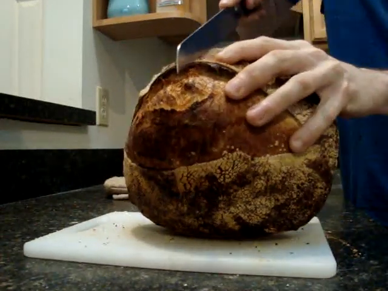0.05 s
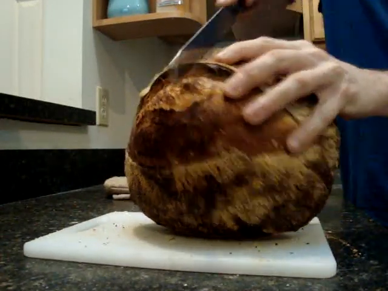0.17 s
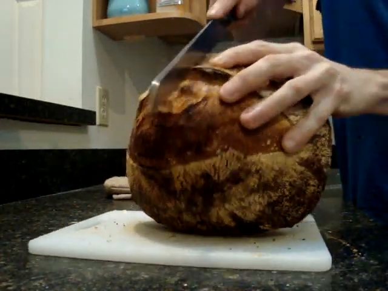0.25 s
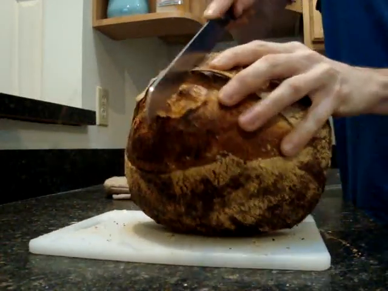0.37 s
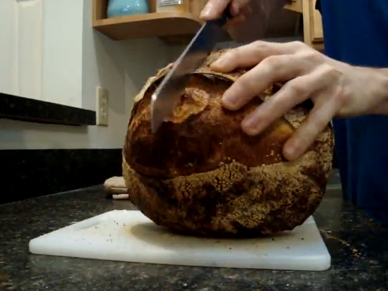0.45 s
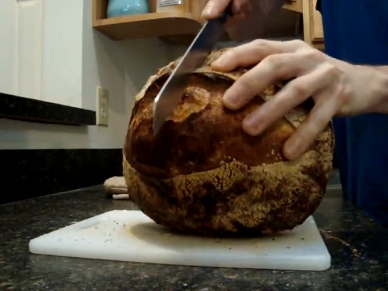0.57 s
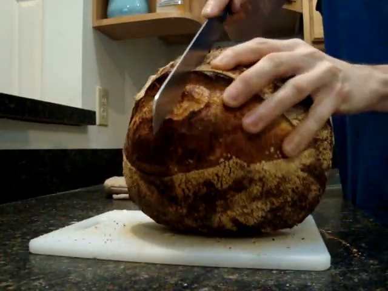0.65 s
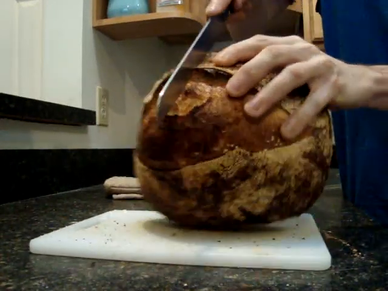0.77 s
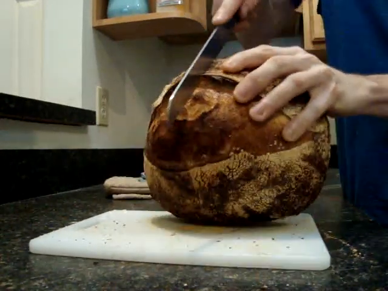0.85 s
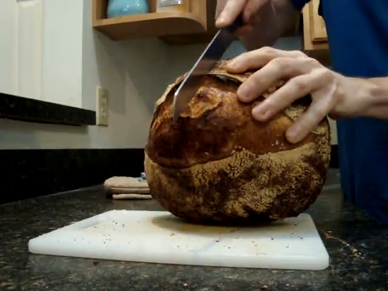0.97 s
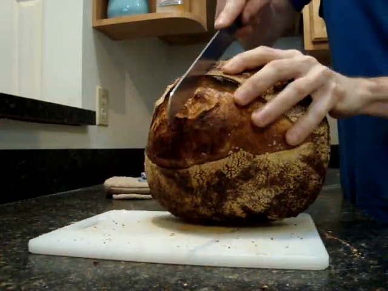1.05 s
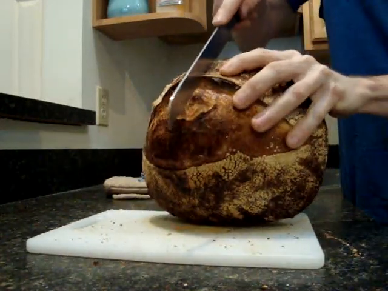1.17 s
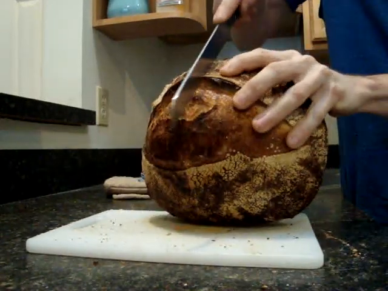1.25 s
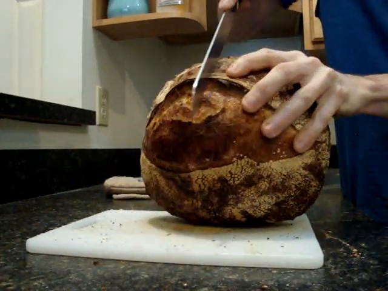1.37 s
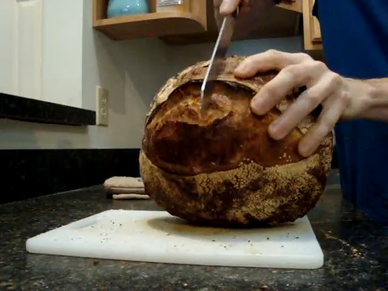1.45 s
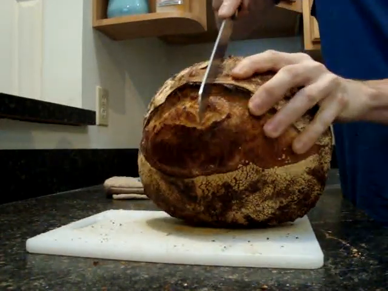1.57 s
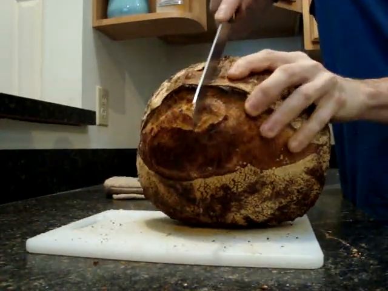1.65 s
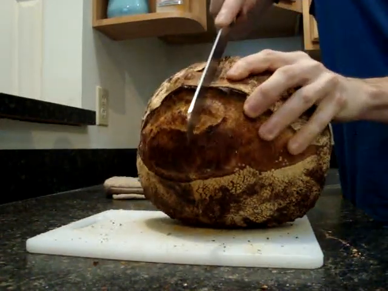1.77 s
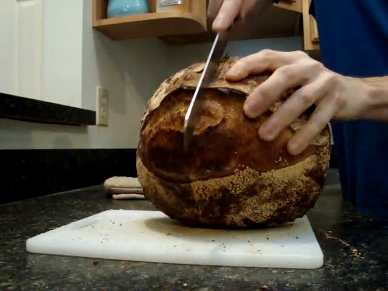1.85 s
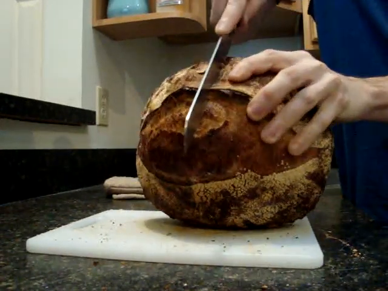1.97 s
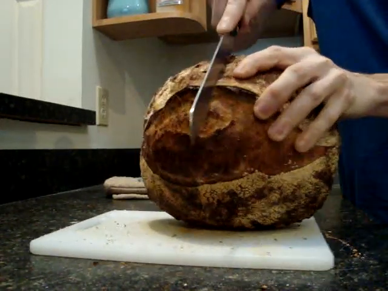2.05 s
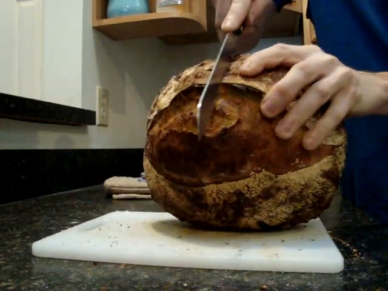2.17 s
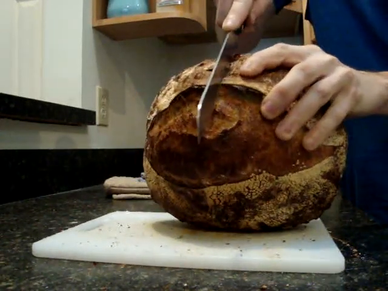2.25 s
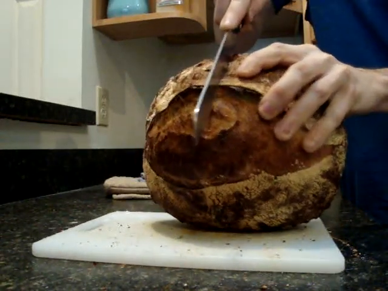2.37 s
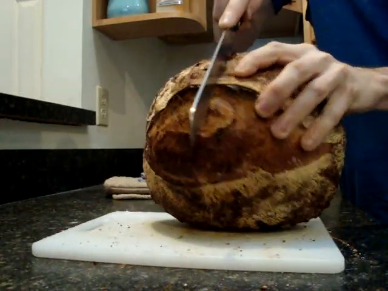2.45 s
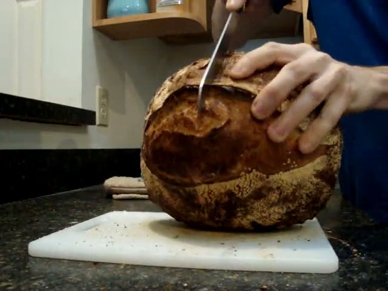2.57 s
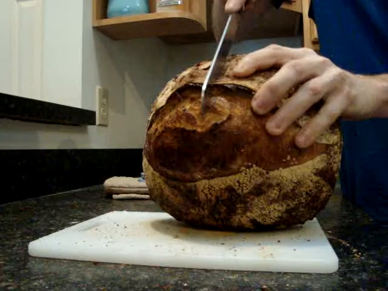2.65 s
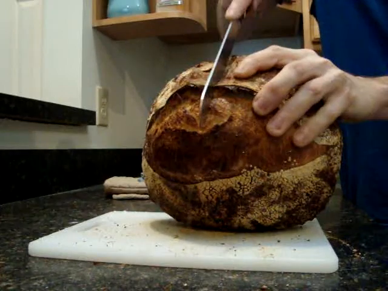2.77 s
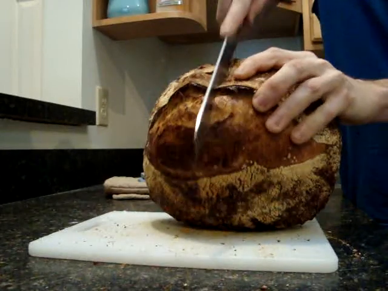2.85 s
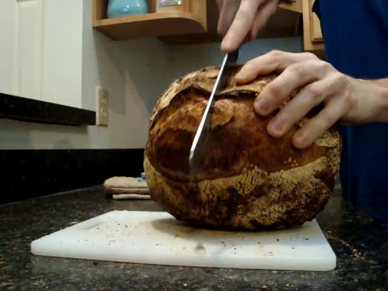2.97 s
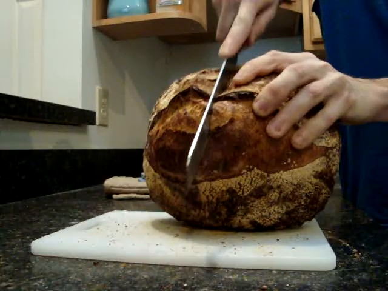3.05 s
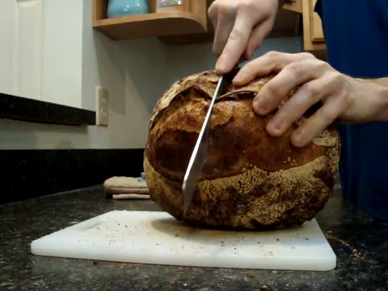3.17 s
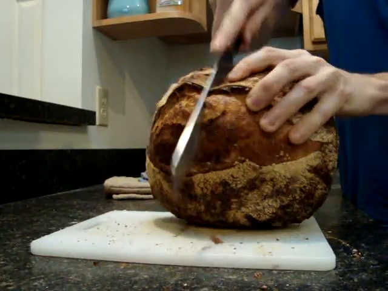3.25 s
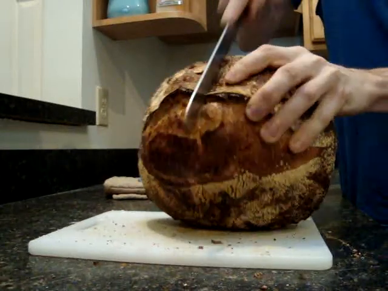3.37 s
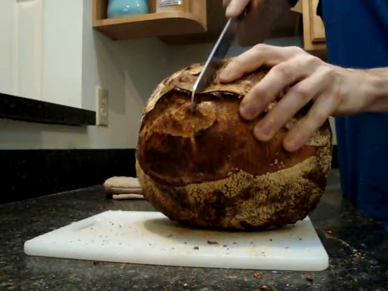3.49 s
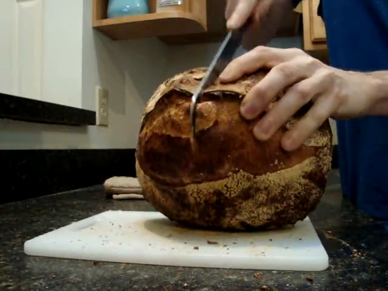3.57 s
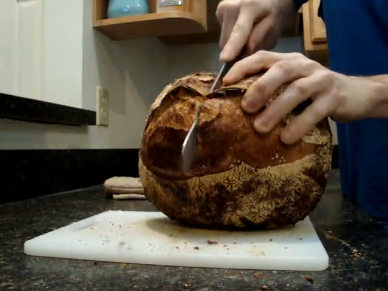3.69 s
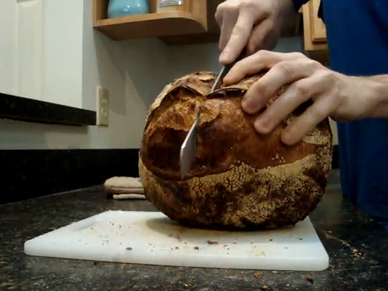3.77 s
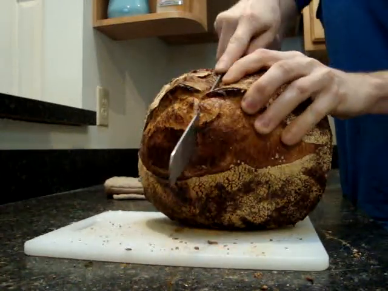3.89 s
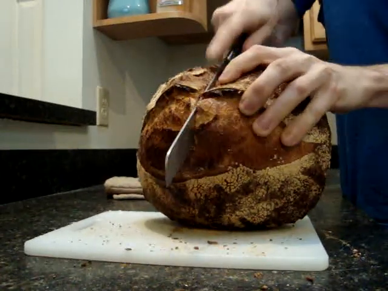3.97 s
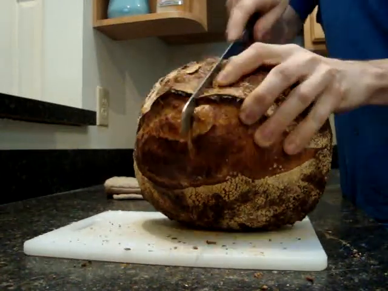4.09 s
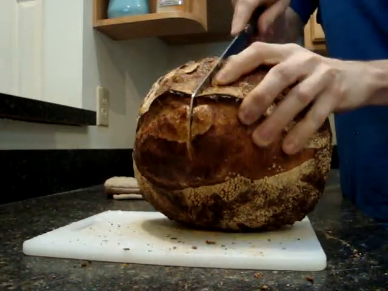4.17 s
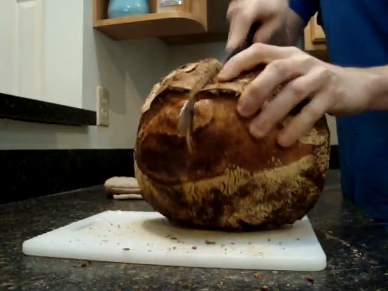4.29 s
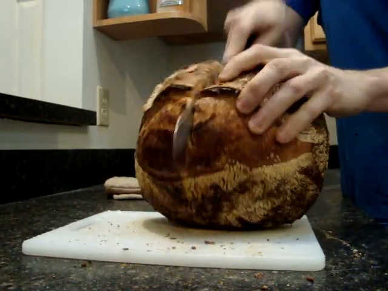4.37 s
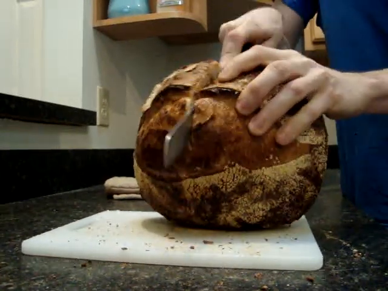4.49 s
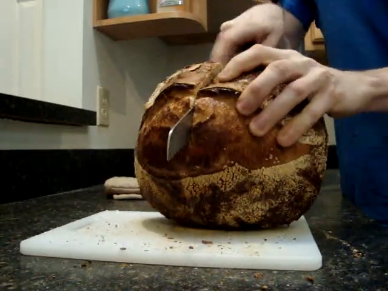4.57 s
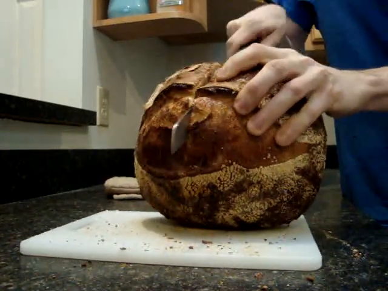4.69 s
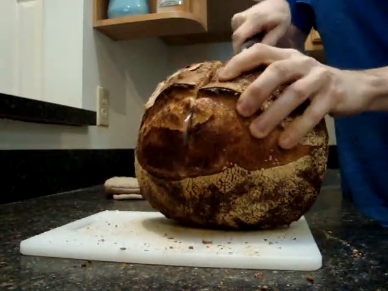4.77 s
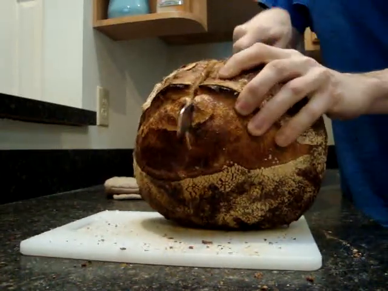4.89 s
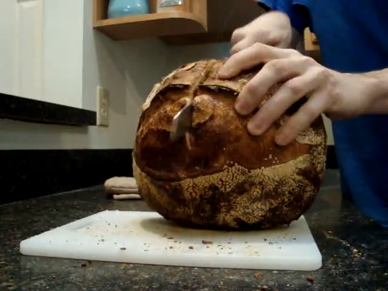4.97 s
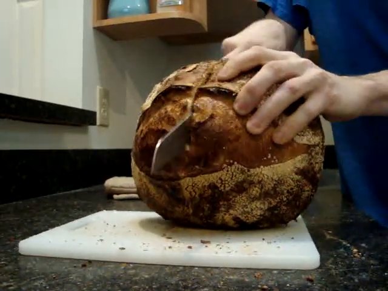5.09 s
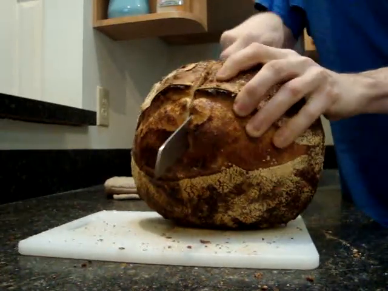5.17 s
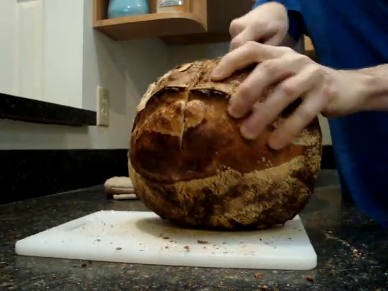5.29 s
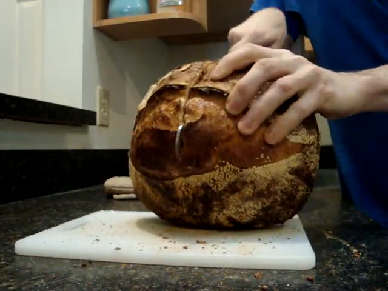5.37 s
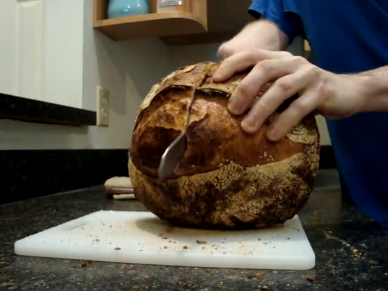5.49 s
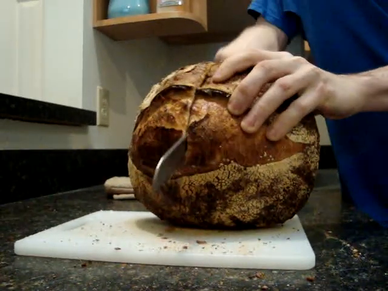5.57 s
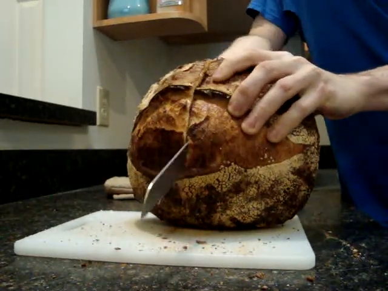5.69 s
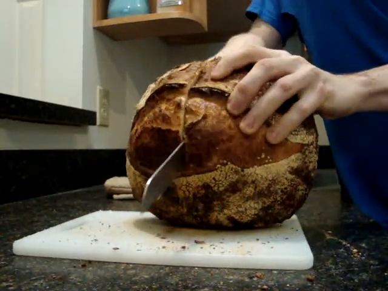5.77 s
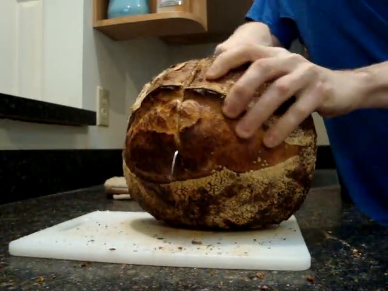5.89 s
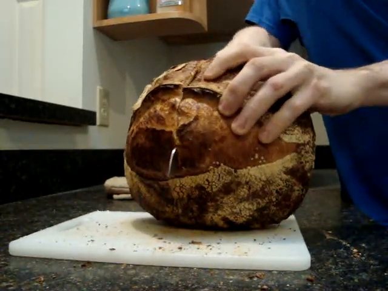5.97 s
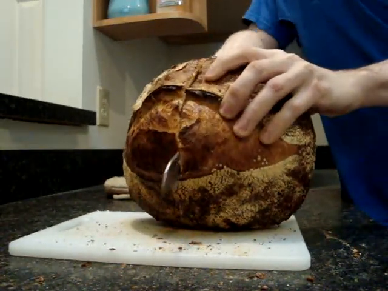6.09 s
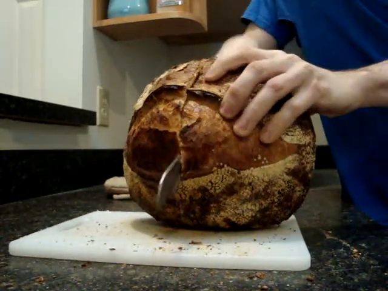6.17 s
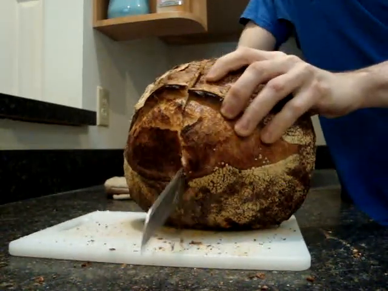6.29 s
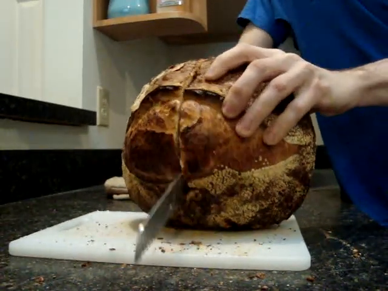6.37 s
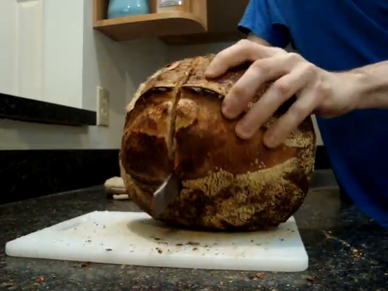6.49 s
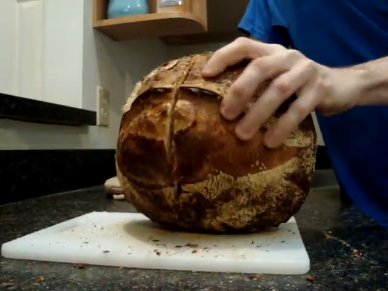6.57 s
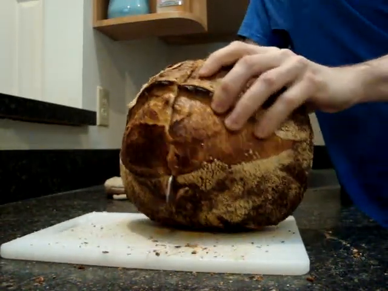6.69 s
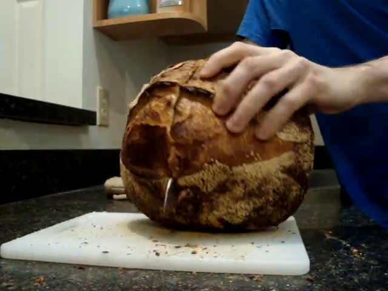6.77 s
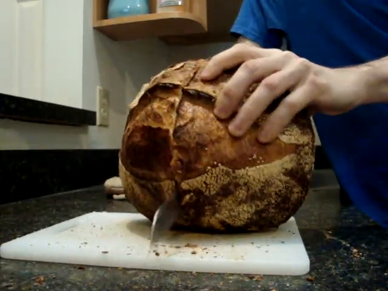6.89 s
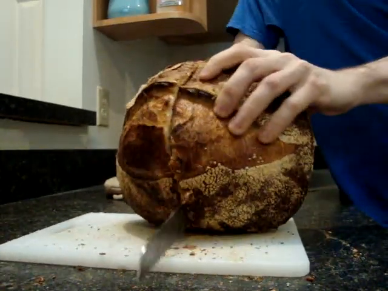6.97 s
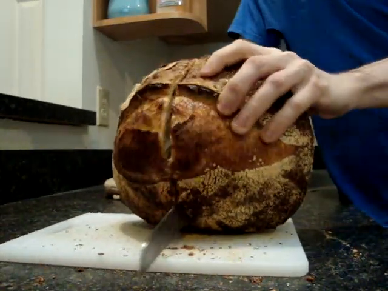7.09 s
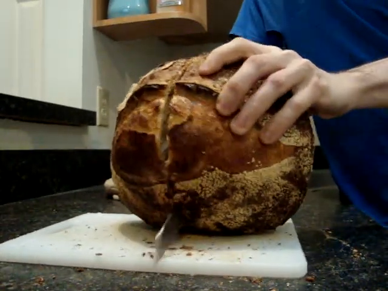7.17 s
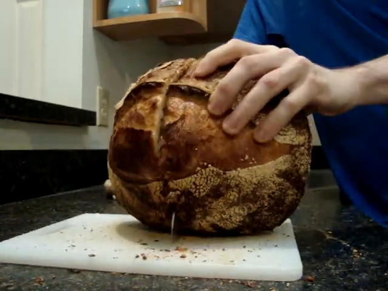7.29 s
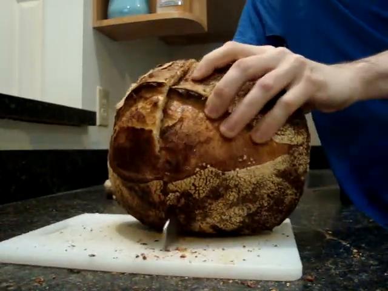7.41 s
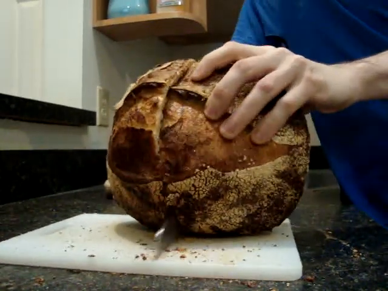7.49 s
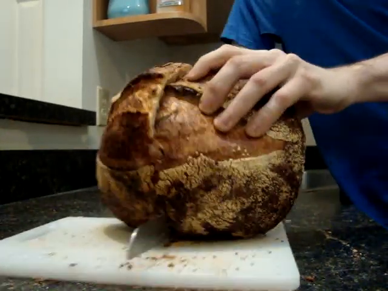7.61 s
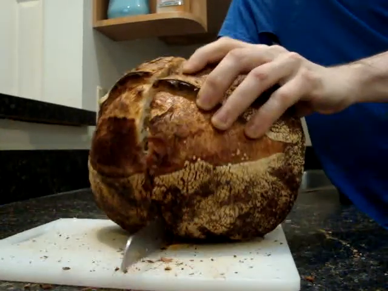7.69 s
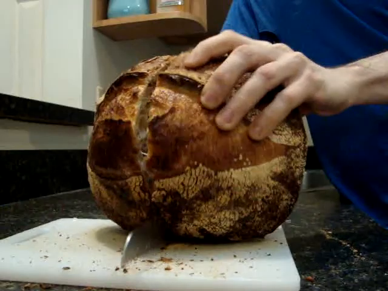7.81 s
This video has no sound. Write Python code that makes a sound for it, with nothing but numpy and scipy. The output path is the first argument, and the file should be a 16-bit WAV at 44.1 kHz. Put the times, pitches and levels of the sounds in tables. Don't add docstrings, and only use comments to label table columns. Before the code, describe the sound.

Hard-crusted round loaf being cut on a plastic board, heard very close in a quiet small room. Irregular bursts of crisp splintering ring the hollow loaf, separated by lulls with loose ticks and faint creaks. Large flakes crack sharply. From the middle on, sawing is more regular, muffled by crumb, with board thumps, a tiny rising squeak and strong late crunches.

```python
import sys
import numpy as np
from scipy import signal
from scipy.fft import rfft, irfft, next_fast_len
from scipy.io import wavfile
from scipy.ndimage import minimum_filter1d

SR = 44100
rng = np.random.default_rng(int(sys.argv[2]) if len(sys.argv) > 2 else 0)


def gain_from_db(level_db):
    decades = np.asarray(level_db, float) / 20
    return 10 ** decades


def generate_wav(signal):
    frames = np.transpose(np.atleast_2d(signal))
    scaled = np.clip(frames, -1, 1) * 32767
    pcm = np.round(scaled).astype(np.int16)
    wavfile.write(sys.argv[1], SR, pcm)


N = 345744

# (frequency [Hz], density [dB per Hz])
AIR_SPECTRUM = [(18, -31), (30, -14.5), (65, -23), (479, 6), (568, 3), (1090, 2), (10000, -22.5),
                (13000, -57), (22000, -120)]
# (time [s], peak [dB])
ROCKS = [
    (0.407, -41),
    (0.52, -55),
    (0.755, -45),
    (1.859, -50),
    (1.978, -40),
]
# (middle [s], length [s], level [dB], ring [Hz], width [Hz])
RUBS = [
    (2.57, .08, -55, 110, 25),
    (3.87, 0.11, -42, 2850, 140),
    (3.895, 0.08, -62.5, 85, 13),
    (4.148, 0.08, -59, 110, 25),
    (5.597, .15, -59, 90.5, 16),
    (6.919, 0.18, -52.5, 80.6, 13),
    (7.7, .1, -69, 79.7, 14),
]
# (time [s], pitch [Hz], level [dB])
SQUEAK = [
    (5.235, 535, -58),
    (5.258, 758, -36),
    (5.277, 1023, -32.5),
    (5.3, 987, -38),
    (5.322, 880, -39),
    (5.335, 845, -58),
]
# (frequency [Hz], width [Hz], level [dB])
LOAF_MODES = [(458, 67, -7), (671, 166, 0), (880, 161, 0.5), (1080, 161, 0)]
# (frequency [Hz], width [Hz], level [dB])
CRUST_MODES = [(1289, 350, 0.5), (1620, 230, -1), (2294, 470, -8), (2850, 380, -8.5)]
# (frequency [Hz], width [Hz], level [dB])
SPLINTER_MODES = [(2850, 570, -1.5), (3854, 560, -1.5), (4157, 1000, -1.5), (6345, 1600, -2),
                  (7390, 1400, -2), (9940, 1700, -3.5)]
# (frequency [Hz], width [Hz], level [dB])
BOARD_MODES = [(85, 15, -11), (152, 58, 3.5), (193.5, 22.4, 7), (270, 74, 10)]
# (start [s], length
# [s], crunch at bite [dB], crunch at end [dB], crust crackle re crunch [dB])
STROKES = [(0.005, 0.056, -36, -42.5, -2), (0.17, 0.058, -26.5, -27.5, -2),
           (0.25, 0.038, -53, -48, 12), (0.392, 0.14, -57, -52, -10), (1.227, 0.12, -37, -37, -6.5),
           (1.47, 0.19, -55.5, -50, -3), (1.691, 0.052, -32.5, -26, -1),
           (1.84, 0.021, -24, -38.5, -2.5), (1.928, 0.067, -51.5, -46.5, 5),
           (2.506, 0.081, -31, -29, -3), (2.685, 0.024, -39.5, -32, -5.5),
           (2.791, 0.024, -30.5, -26.5, -6.5), (2.884, 0.075, -21.5, -28, -4),
           (2.999, 0.072, -31, -46, -8), (3.049, 0.054, -29.5, -58, -5),
           (3.098, 0.058, -28, -37, -0.5), (3.354, 0.11, -30.5, -30, -5),
           (3.618, 0.051, -34, -38.5, -3.5), (3.687, 0.051, -27.5, -25.5, -2),
           (3.857, 0.08, -33, -50, 2.5),
           (4.046, 0.14, -38.5, -38.5, -1.5), (4.329, 0.022, -29, -35.5, 5),
                   (4.378, 0.028, -25.5, -24, 2), (4.421, 0.058, -40.5, -42, -1),
                   (4.686, 0.15, -48.5, -41.5, -2), (4.91, 0.044, -31, -35, -3),
                   (4.976, 0.095, -19.5, -21.5, -5), (5.212, 0.12, -42, -36, -5.5),
                   (5.39, 0.037, -35.5, -44, -1.5), (5.466, 0.22, -26.5, -29, -4),
                   (5.79, 0.015, -51, -35.5, 2.5), (5.837, 0.093, -30.5, -35, -5.5),
                   (6.07, 0.038, -51, -42.5, -3), (6.133, 0.17, -31.5, -34.5, 0.5),
                   (6.447, 0.098, -44.5, -29, -1), (6.729, 0.052, -36.5, -36, 1.5),
                   (6.811, 0.13, -35, -25.5, 1.5), (6.96, 0.042, -35, -38.5, -6.5),
                   (7.127, 0.099, -41.5, -27.5, -4), (7.26, 0.039, -25, -33, -3.5),
                   (7.41, 0.013, -37, -37, -1.5), (7.468, 0.009, -18, -22.5, 0.5),
                   (7.502, 0.056, -27.5, -29, 1.5), (7.579, 0.078, -34, -45, -8)]
# (time [s], depth [cm])
TOOTH_DEPTH = [(0, 0.13), (.55, -0.14), (1.2, 0.48), (1.6, 0.16), (2.5, 0.26), (2.9, 0.39), (3.7, 0.13),
               (3.85, .6), (4.35, 0.46), (4.7, 0.68), (5.0, 0.79), (5.75, 0.54), (6.2, .5), (7.0, 0.49),
               (7.15, 1.13), (7.47, 1.46), (7.56, 0.39), (7.84, 0.93)]
# (time [s], lean [dB])
HAND_LEAN = [(0, -6), (.3, -3.5), (1.3, 4), (1.75, -2.5), (2.55, 2.5), (2.9, -3.5), (3.5, -1), (3.9, -1.5),
             (4.4, 0), (5.2, -1.5), (5.6, 0.5), (6.2, 2), (6.9, 3.5), (7.2, -4), (7.84, 0.5)]
# (time [s], peak [dB], ring [Hz], splinters re peak [dB])
FLAKES = [(0.022, -15, 1000, -13.5), (0.052, -12.5, 645, -27), (0.157, -8.5, 1000, -16),
          (1.32, -18.5, 490, -13), (1.687, -19, 1040, -15), (1.721, -9, 754, -22), (1.824, -16, 880, -15),
          (2.776, -12.5, 960, -30), (2.882, -19, 723, -17), (2.921, -7, 926, -16), (3.099, -16, 1030, -25),
          (3.541, -20.5, 680, -19), (3.575, -15, 840, -5), (3.684, -15, 1270, -11),
          (3.831, -15, 1380, -24.5), (4.317, -19, 1280, -14), (4.327, -12, 1590, -14),
          (4.35, -8, 1270, -26), (4.377, -9.5, 1680, -21), (4.961, -11, 1070, -25), (5.456, -12, 680, -23),
          (5.838, -14.5, 990, -24), (6.137, -16, 850, -30), (6.183, -10.5, 966, -11),
          (6.211, -6, 1620, -26), (6.248, -12.5, 1610, -17), (6.533, -11, 770, -22),
          (6.743, -16.5, 1616, -28), (7.127, -12.5, 810, -36), (7.463, -28, 1130, -26)]
# (time [s], peak [dB], ring [Hz], splinters re peak [dB])
CHIPS = [(0.134, -31, 1040, -4), (0.315, -27, 2740, -13), (0.401, -24.5, 2260, -18),
         (0.411, -27.5, 1090, 1.5), (0.474, -28, 1080, -5), (0.512, -23.5, 1050, -5),
         (0.607, -34, 1630, -19), (0.693, -33.5, 750, -17), (0.754, -28.5, 1010, -8),
         (0.883, -33, 646, -15), (1.457, -22.5, 970, -6.5), (1.497, -24.5, 1140, -10),
         (1.561, -24, 1080, -9.5), (1.614, -19.5, 990, -1.5), (1.938, -19.5, 2770, -4.5),
         (1.969, -26, 2850, -6), (2.322, -32, 1710, -18), (2.586, -21, 760, -1), (2.702, -24, 880, -16),
         (3.624, -20, 930, -1), (3.807, -17.5, 1670, -17), (3.853, -25.5, 1370, -13),
         (4.586, -25, 880, -11), (4.913, -23.5, 1340, -16), (5.407, -14.5, 1020, -17),
         (5.77, -25.5, 1201, -3), (6.303, -16, 896, -12), (6.809, -18.5, 880, -18),
         (7.758, -26.5, 1100, -27), (7.781, -20, 1760, -36)]

AIR_DB = -55.5
KITCHEN_T60_S, WALL_CUT_HZ, KITCHEN_DB = 0.16, 35000, -17
BITE_DB_PER_S, LET_GO_DB_PER_S = 788, 804
SWELL_DB, SWELL_DB_PER_S = -12.5, 308
SETTLE_DB, SETTLE_DB_PER_S = -15, 99.5
CREAK_DB, CREAK_GROWS_DB_PER_S, CREAK_CRUST_DB = -65.5, 1.69, 2.5
REFERENCE_CRUNCH_DB = -35
SPLINTER_DB = 2
CRUMB_DAMPS_DB_PER_CM, FORCE_DULLS_DB_PER_DB = 8, 0.2
BOARD_DB, BOARD_LAGS_DB_PER_DB = -17.5, 0.13
TEETH_PER_S, TEETH_WANDER, CRUMB_CUT_HZ = 85, 0.3, 6100
SNAPS_PER_S, SNAP_OVER_CRUNCH_DB, SNAP_HZ, SNAP_SPREAD = 30, 6, 1093, 0.35
SNAP_LAGS_DB_PER_DB, SNAP_SPLINTER_DB = 0.34, -12.5
JERK_DB, JERK_DYING_S = -21, 0.0082


def rms_one(x):
    return x / np.sqrt(np.mean(x ** 2) + 1e-20)


def in_time(rows):
    times_s, *columns = np.transpose(rows)
    return [np.interp(np.arange(N) / SR, times_s, column) for column in columns]


def drift(rate_hz):
    r = np.exp(-20 * np.pi * rate_hz / SR)
    noise = rng.standard_normal(N // 10 + 4002)
    slow = signal.lfilter([1], [1, -2 * r, r * r], noise)[4000:]
    return np.interp(np.arange(N) / 10, np.arange(len(slow)), rms_one(slow))


def filtered(x, order, hz, kind):
    return signal.sosfilt(signal.butter(order, hz, kind, fs=SR, output="sos"), x)


def dying_sum(x, dying_s):
    return signal.lfilter([1], [1, -np.exp(-1 / (dying_s * SR))], x)


def resonance(x, hz, width_hz):
    r = np.exp(-np.pi * width_hz / SR)
    poles = [1, -2 * r * np.cos(2 * np.pi * hz / SR), r * r]
    return signal.lfilter([(1 - r * r) / 2, 0, (r * r - 1) / 2], poles, x + 1e-18)


def body(clicks, modes, scatter_db):
    total = np.zeros(N)
    for k, (hz, width_hz, level_db) in enumerate(modes):
        struck = clicks * gain_from_db(scatter_db * rng.standard_normal(N))
        gain = gain_from_db(level_db) / np.sqrt(width_hz) * (-1) ** k
        total += gain * resonance(struck, hz, width_hz)
    return rms_one(total)


def fractures(per_s, spread_db):
    sizes = gain_from_db(spread_db * np.minimum(rng.exponential(1, N), 3.2))
    signs = rng.choice([-1, 1], N)
    return rms_one(sizes * signs * (rng.random(N) < per_s / SR))


def room_tone():
    hz = np.maximum(np.arange(N // 2 + 1) * SR / N, 1)
    point_hz, point_db = np.transpose(AIR_SPECTRUM)
    shape = gain_from_db(np.interp(np.log(hz), np.log(point_hz), point_db))
    return gain_from_db(AIR_DB) * rms_one(irfft(rfft(rng.standard_normal(N)) * shape, N))


def kitchen(x):
    size = next_fast_len(N + SR)
    w = 2 * np.pi * np.arange(size // 2 + 1) / size
    dull = 1 / (1 + (w * SR / (2 * np.pi * WALL_CUT_HZ)) ** 2) ** 0.13
    response = 0
    for k, lag in enumerate(rng.uniform(0.006, 0.03, 10) * SR):
        loop = gain_from_db(-60 * lag / SR / KITCHEN_T60_S) * dull * np.exp(-1j * w * lag)
        response = response + (-1) ** k * loop / (1 - loop)
    return irfft(rfft(x, size) * response, size)[:N]


def rocking():
    pushes = np.zeros(N)
    for s, peak_db in ROCKS:
        pushes[round(s * SR)] = gain_from_db(peak_db - 11.0)
    t = np.arange(2048) / SR / 0.0012
    return np.convolve(pushes, t * np.exp(1 - t))[:N]


def rubs():
    t, out = np.arange(N) / SR, np.zeros(N)
    grit = fractures(per_s=1500, spread_db=3.0)
    for middle_s, length_s, level_db, hz, width_hz in RUBS:
        ring = rms_one(resonance(resonance(grit, hz, width_hz), hz, 2 * width_hz))
        swell = np.exp(-(2 * (t - middle_s) / length_s) ** 2)
        out += gain_from_db(level_db) * swell * ring
    return out


def squeak():
    hz, level_db = in_time(SQUEAK)
    phase = 2 * np.pi * np.cumsum(hz * (1 + 0.0255 * drift(137))) / SR
    n = np.arange(N)
    sounding = (n > SQUEAK[0][0] * SR) & (n < SQUEAK[-1][0] * SR)
    tone = np.sin(phase) + 0.21 * np.sin(2 * phase) + 0.17 * np.sin(3 * phase)
    return np.sqrt(2) * sounding * gain_from_db(level_db + 1.8 * drift(120)) * tone


def chance_snaps(crunch_db, splinter_db):
    when, size, pitch = rng.random((3, round(SNAPS_PER_S * N / SR)))
    at = (when * N).astype(int)
    hz = SNAP_HZ * np.exp(SNAP_SPREAD * np.log(pitch / (1 - pitch)).clip(-2, 3))
    lag_db = SNAP_LAGS_DB_PER_DB * (crunch_db[at] - REFERENCE_CRUNCH_DB)
    peak_db = crunch_db[at] - lag_db + SNAP_OVER_CRUNCH_DB + 6.7 * size
    return list(zip(at / SR, peak_db, hz, splinter_db[at] + SNAP_SPLINTER_DB))


def snaps(breaks):
    length = 2048
    out = np.zeros(N + length)
    dying = np.exp(-np.arange(length) / SR / 0.0023)
    for s, peak_db, hz, splinter_db in breaks:
        noise, dust = rng.standard_normal((2, length))
        crack = 0.031 * noise ** 3 * dying
        crack[0] = np.sign(noise[0])
        ring = resonance(crack, hz, 0.17 * hz)
        ring += 0.077 * resonance(crack, 1500, 600)
        ring += 0.05 * resonance(crack, 2.57 * hz, 1300)
        ring += 0.13 * resonance(crack, 2820, 120)
        spray = filtered(crack + 0.65 * dust * dying, 1, [2000, 6500], "band")
        spray *= gain_from_db(splinter_db + 6.0) / np.abs(spray).max()
        at = round(s * SR)
        out[at:at + length] += gain_from_db(peak_db) * (ring / np.abs(ring).max() + spray)
    return filtered(out[:N], 2, 250, "high")


def strokes():
    t = np.arange(N) / SR
    crunch = gain_from_db(CREAK_DB + CREAK_GROWS_DB_PER_S * t)
    crust = crunch * gain_from_db(CREAK_CRUST_DB)
    for s, length_s, bite_db, end_db, crust_db in STROKES:
        end_s = s + length_s
        span = slice(max(round((s - 0.1) * SR), 0), round((end_s + 0.6) * SR))
        early_s = np.maximum(s - t[span], 0)
        late_s = np.maximum(t[span] - end_s, 0)
        rise_db = np.maximum(-BITE_DB_PER_S * early_s, SWELL_DB - SWELL_DB_PER_S * early_s)
        fall_db = np.maximum(-LET_GO_DB_PER_S * late_s, SETTLE_DB - SETTLE_DB_PER_S * late_s)
        run_db = np.interp(t[span], [s, end_s], [bite_db, end_db])
        force = gain_from_db(run_db + rise_db + fall_db)
        crunch[span] += force
        crust[span] += force * gain_from_db(crust_db)
    return 20 * np.log10(crunch), 20 * np.log10(crust / crunch)


def bites(per_s, dying_s, between):
    passed = np.floor(np.cumsum(per_s * np.exp(TEETH_WANDER * drift(20))) / SR)
    catches = np.diff(passed, prepend=0) * np.minimum(rng.exponential(1, N), 2) ** 0.9
    return between + dying_sum(catches, dying_s)


def jerks():
    force = np.zeros(N)
    for s, peak_db, _, _ in FLAKES + CHIPS:
        force[round(s * SR)] += gain_from_db(peak_db + JERK_DB)
    return dying_sum(force + 1e-18, JERK_DYING_S)


def sawing(crunch_db, crust_db, splinter_db, board_db, depth_cm):
    teeth = bites(TEETH_PER_S, dying_s=0.0031, between=np.maximum(0.65 - 0.3 * depth_cm, 0.2))
    coarse = teeth * fractures(per_s=2500, spread_db=2.5)
    fine = 1.4 * coarse + teeth ** 0.6 * fractures(per_s=8000, spread_db=2.5)
    loaf = filtered(body(coarse, LOAF_MODES, scatter_db=1.5), 2, 400, "high")
    crust = filtered(body(coarse + 0.67 * fine, CRUST_MODES, scatter_db=4.5), 2, 400, "high")
    crust *= gain_from_db(crust_db)
    splinters = gain_from_db(splinter_db) * body(fine, SPLINTER_MODES, scatter_db=3.0)
    muffled = filtered(splinters, 2, CRUMB_CUT_HZ, "low")
    buried = np.clip(0.6 * depth_cm, 0, 0.6)
    splinters = filtered(splinters + buried * (muffled - splinters), 2, 400, "high")
    board = filtered(body(coarse, BOARD_MODES, scatter_db=3.0), 3, 68, "high")
    stroke = gain_from_db(crunch_db) * (loaf + crust + splinters)
    freed = jerks() * (loaf + crust + 0.75 * splinters)
    return stroke + freed + gain_from_db(crunch_db + board_db) * board


def scene():
    crunch_db, crust_db = strokes()
    depth_cm, = in_time(TOOTH_DEPTH)
    lean_db, = in_time(HAND_LEAN)
    force_db = crunch_db - REFERENCE_CRUNCH_DB
    splinter_db = SPLINTER_DB - CRUMB_DAMPS_DB_PER_CM * depth_cm - FORCE_DULLS_DB_PER_DB * force_db
    board_db = BOARD_DB + lean_db - BOARD_LAGS_DB_PER_DB * force_db
    breaks = FLAKES + CHIPS + chance_snaps(crunch_db, splinter_db)
    bread = sawing(crunch_db, crust_db, splinter_db, board_db, depth_cm) + snaps(breaks) + squeak()
    mix = bread + gain_from_db(KITCHEN_DB) * kitchen(bread) + rocking() + rubs() + room_tone()
    return mix[None]


def drop_weak_bands(x, cutoff_hz, bear_db, tilt_db, scatter_db):
    block = 256
    n = np.arange(2 * block) + 0.5
    k = np.arange(cutoff_hz * 2 * block // SR)[:, None] + 0.5
    window = np.sin(np.pi * n / (2 * block))
    basis = window * np.cos(np.pi / block * (n + block / 2) * k) * np.sqrt(2 / block)
    halves = np.pad(x, (block, 2 * block - N % block)).reshape(-1, block)
    lines = np.hstack([halves[:-1], halves[1:]]) @ basis.T
    band = (5 * np.log2(1 + k[:, 0] / 10)).astype(int)
    member = band[:, None] == np.arange(band.max() + 1)
    lines_per_band = member.sum(axis=0)
    band_db = 10 * np.log10(lines ** 2 @ member / lines_per_band + 1e-12)
    whole_db = 10 * np.log10(np.mean(lines ** 2, axis=1, keepdims=True) + 1e-12)
    loudest_neighbour_db = -minimum_filter1d(-band_db, size=7, axis=0)
    treble_db = tilt_db * np.log2(k[:, 0] @ member / lines_per_band / 80)
    want_db = loudest_neighbour_db - band_db + 0.3 * (whole_db - band_db) + treble_db
    want_db += scatter_db * rng.standard_normal(band_db.shape)
    blocks = (lines * (want_db < bear_db)[:, band]) @ basis
    first = np.pad(blocks[:, :block], ((0, 1), (0, 0)))
    second = np.pad(blocks[:, block:], ((1, 0), (0, 0)))
    return (first + second).ravel()[block:block + N]


def band_limit(x):
    return signal.sosfilt(signal.butter(12, 11140, fs=SR, output="sos"), x)


def record(dry):
    rounded = 0.75 * np.tanh(dry[0] / 0.75)
    cutoff_hz = 10020
    thin = drop_weak_bands(rounded, cutoff_hz, bear_db=9.6, tilt_db=6.0, scatter_db=3.2)
    edge = signal.ellip(6, 0.5, 30, cutoff_hz + 80, fs=SR, output="sos")
    mix = signal.sosfilt(edge, thin)[None]
    return band_limit(mix)


dry = scene()
out = record(dry)
generate_wav(out)
```